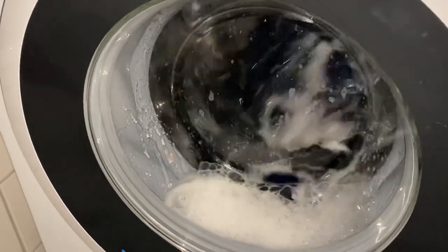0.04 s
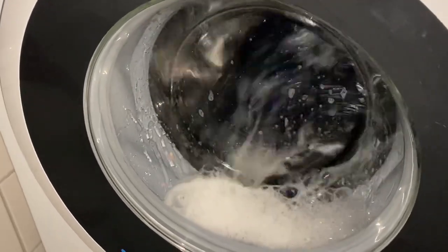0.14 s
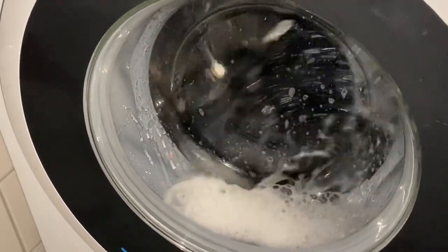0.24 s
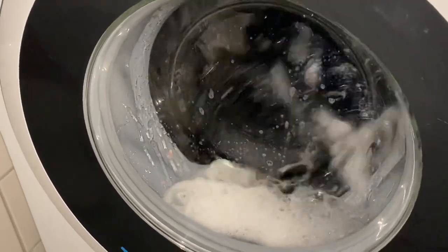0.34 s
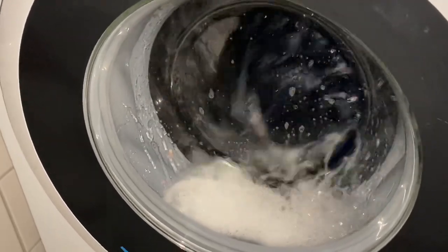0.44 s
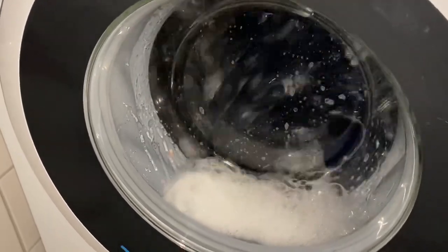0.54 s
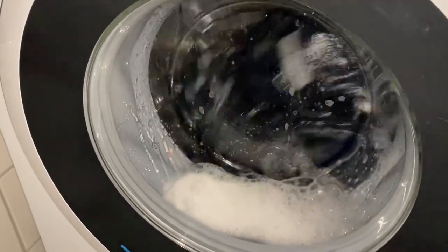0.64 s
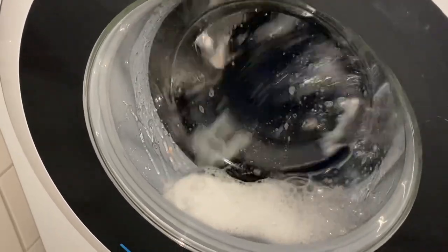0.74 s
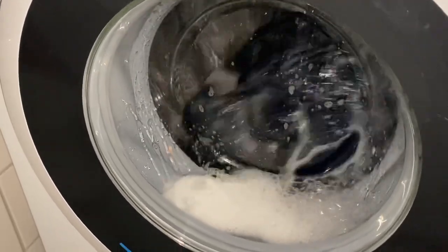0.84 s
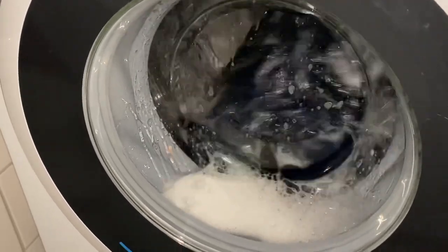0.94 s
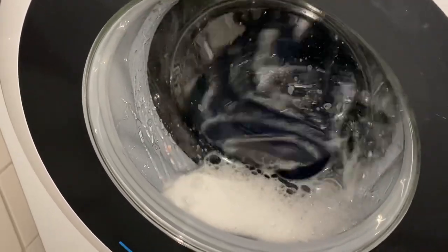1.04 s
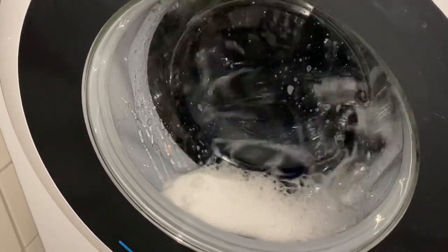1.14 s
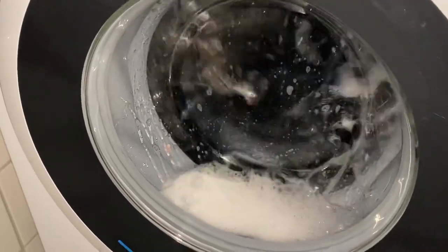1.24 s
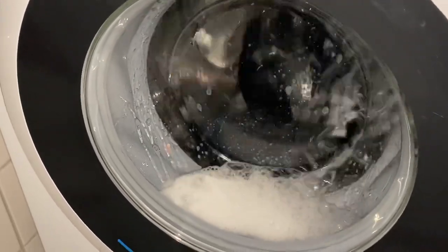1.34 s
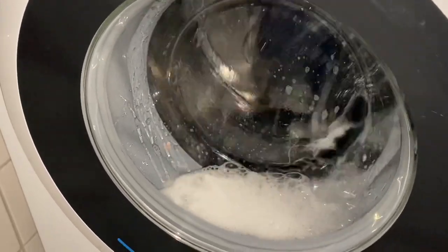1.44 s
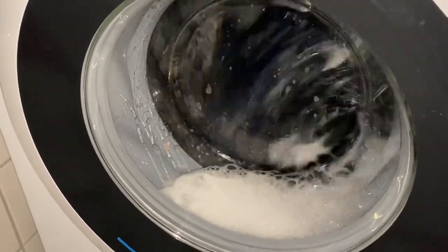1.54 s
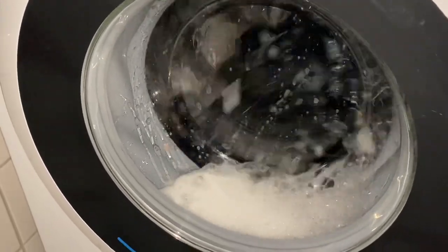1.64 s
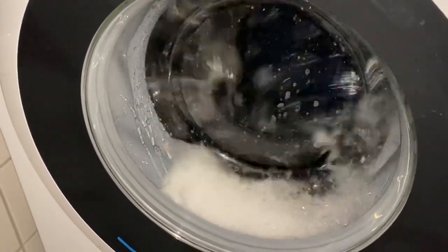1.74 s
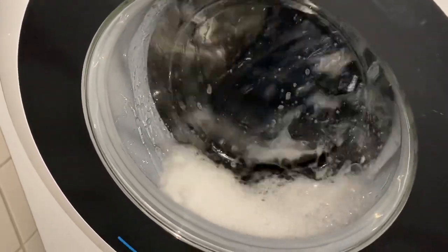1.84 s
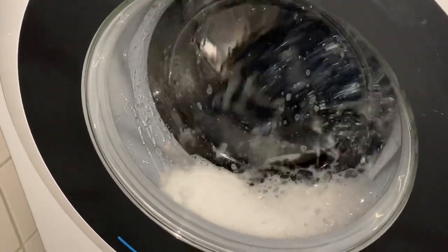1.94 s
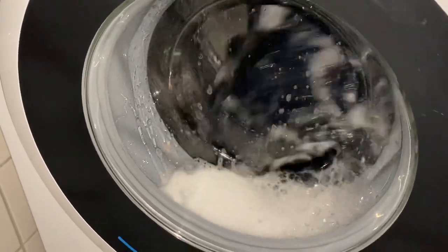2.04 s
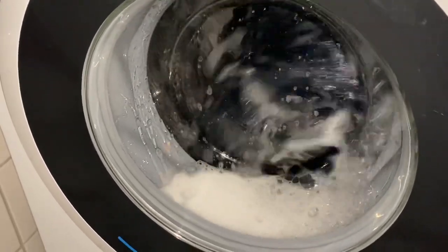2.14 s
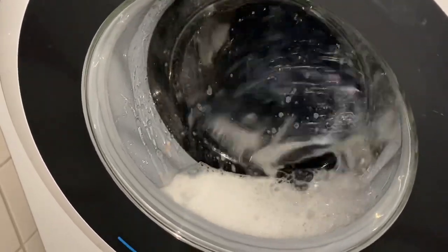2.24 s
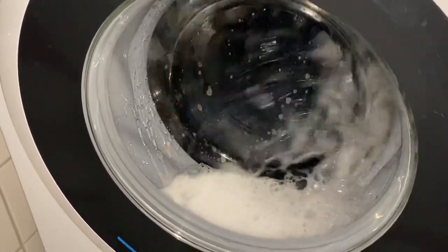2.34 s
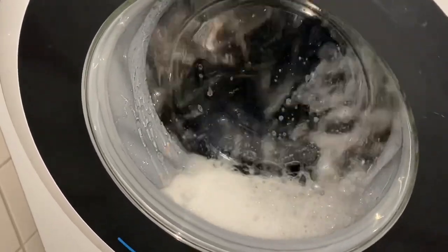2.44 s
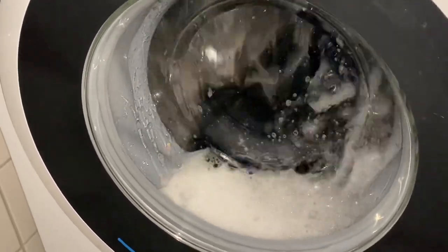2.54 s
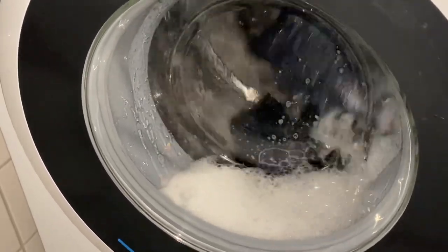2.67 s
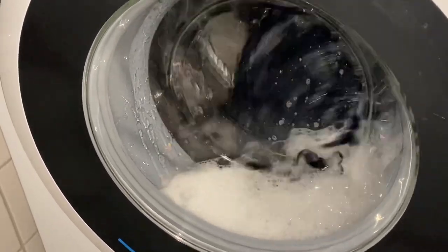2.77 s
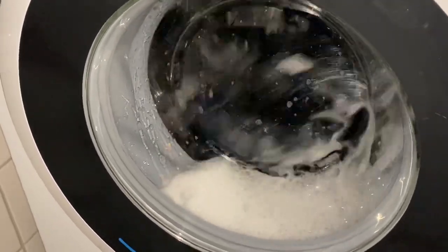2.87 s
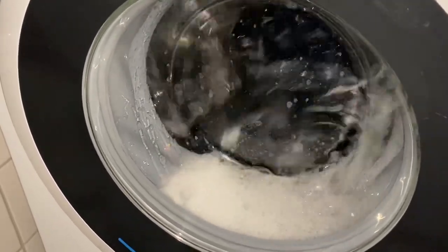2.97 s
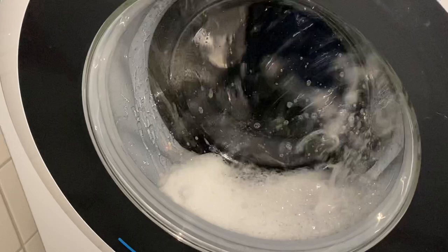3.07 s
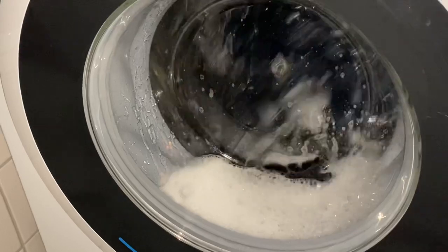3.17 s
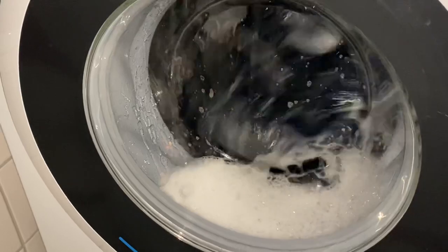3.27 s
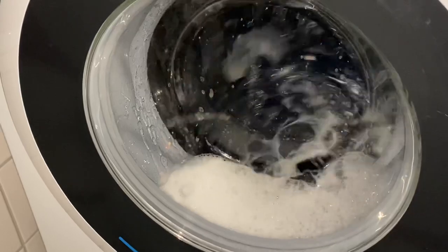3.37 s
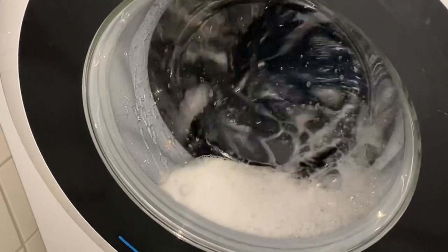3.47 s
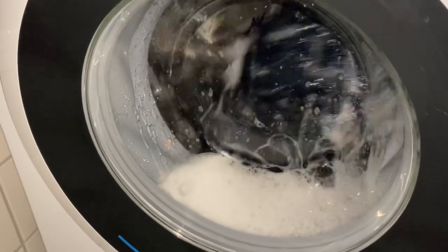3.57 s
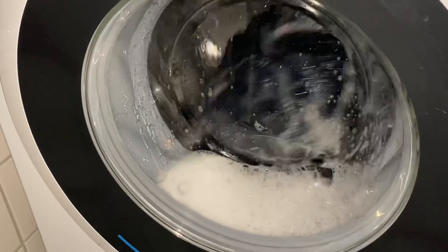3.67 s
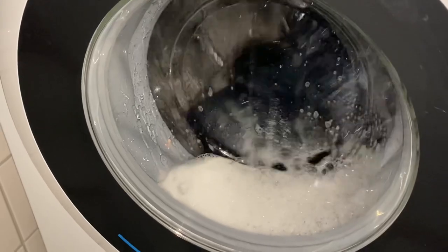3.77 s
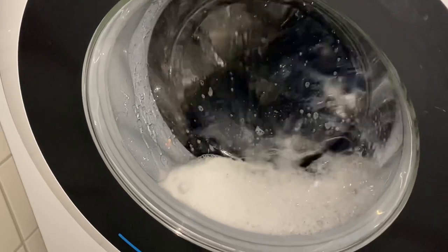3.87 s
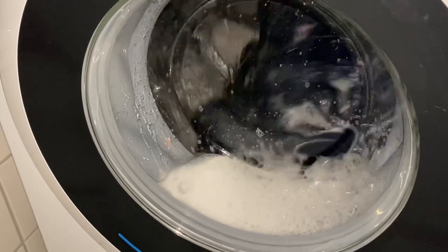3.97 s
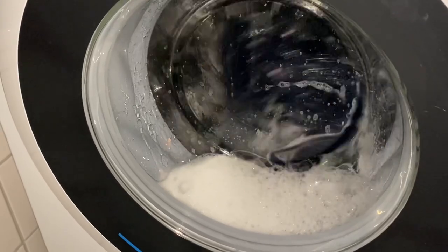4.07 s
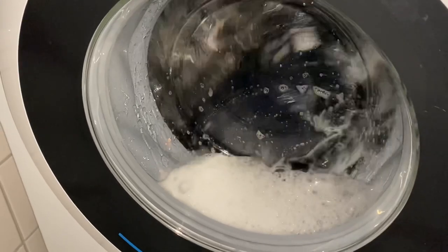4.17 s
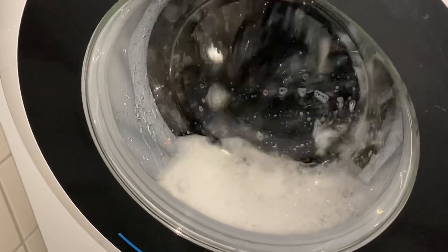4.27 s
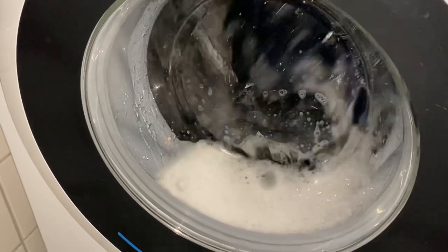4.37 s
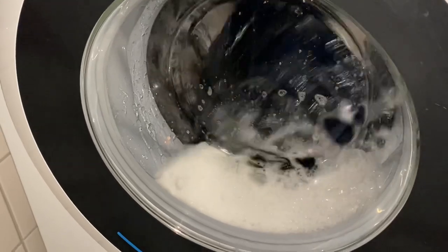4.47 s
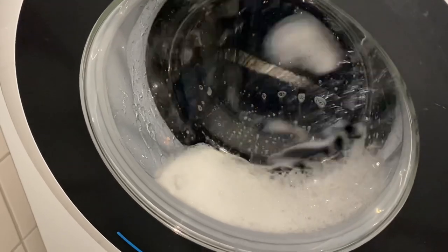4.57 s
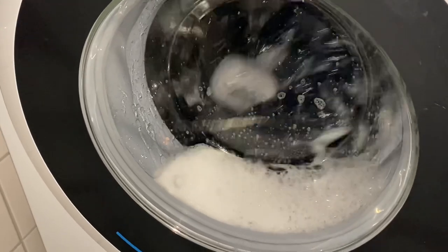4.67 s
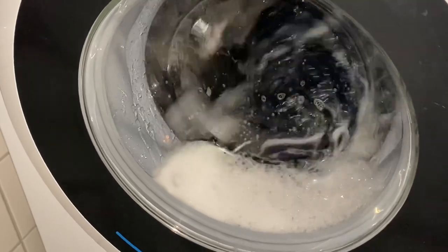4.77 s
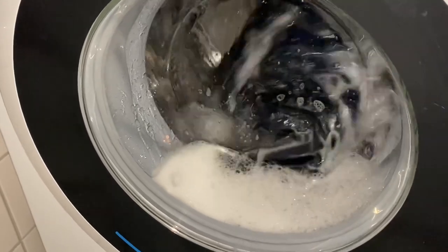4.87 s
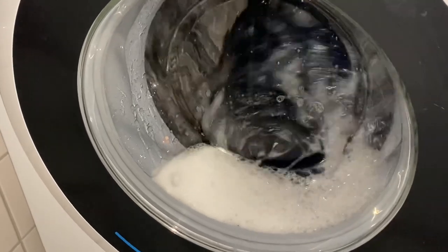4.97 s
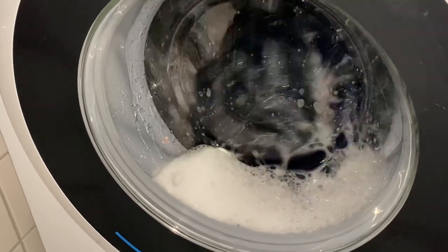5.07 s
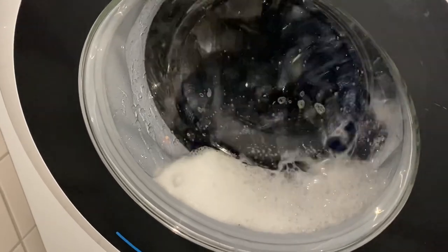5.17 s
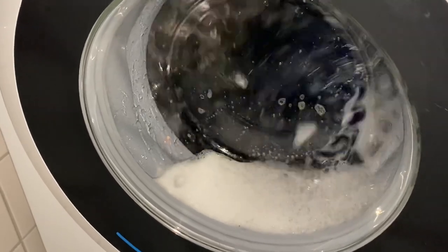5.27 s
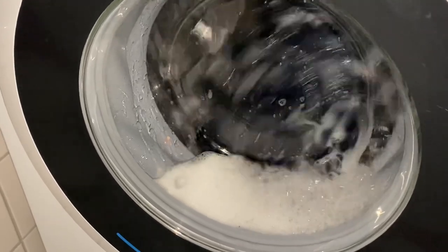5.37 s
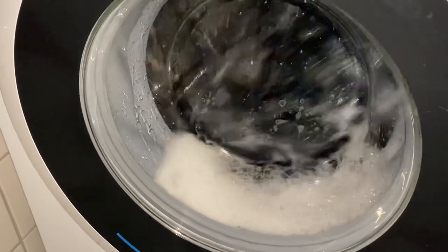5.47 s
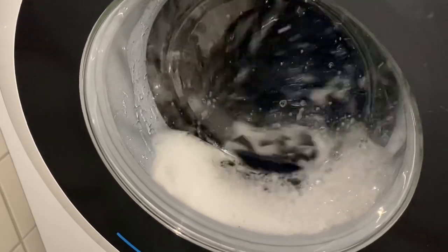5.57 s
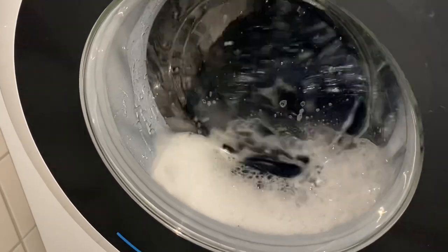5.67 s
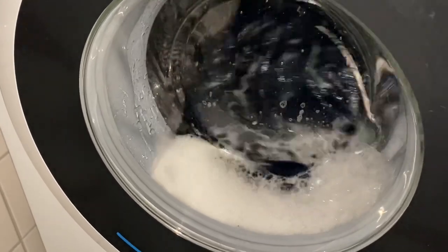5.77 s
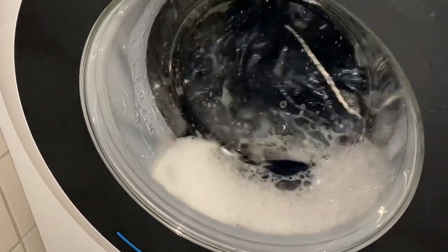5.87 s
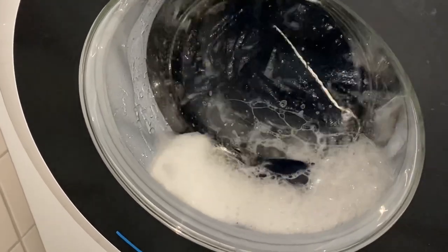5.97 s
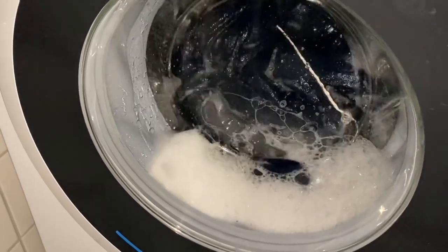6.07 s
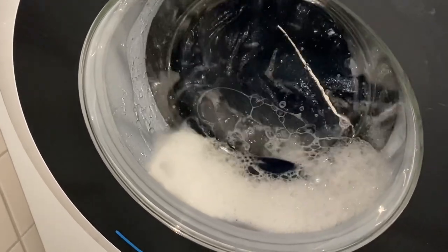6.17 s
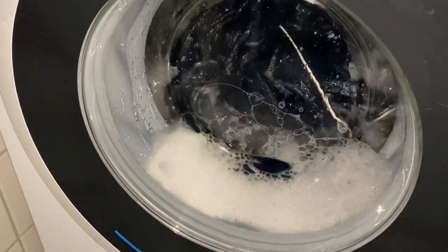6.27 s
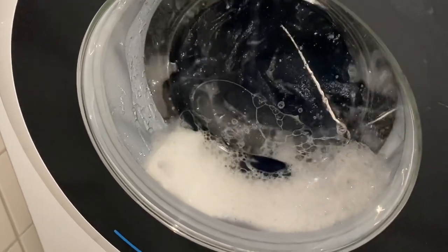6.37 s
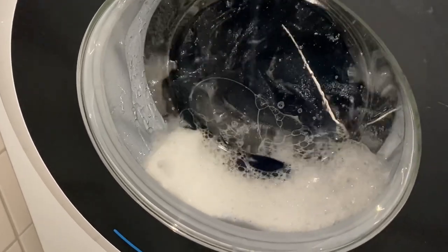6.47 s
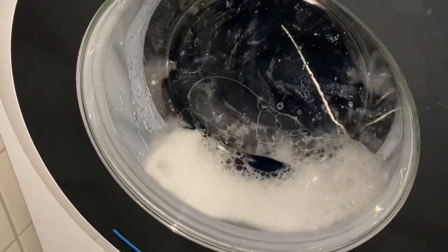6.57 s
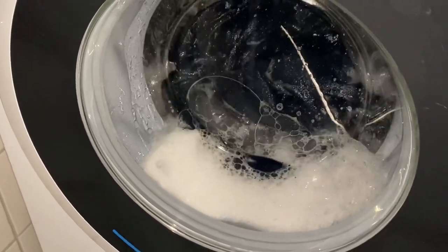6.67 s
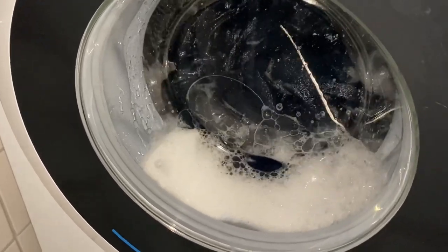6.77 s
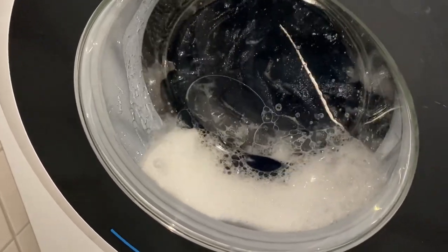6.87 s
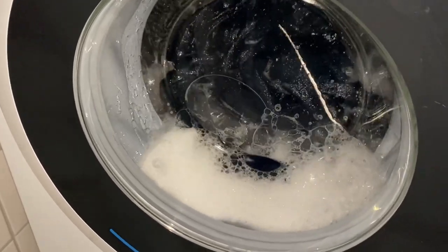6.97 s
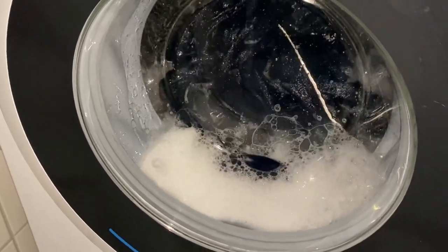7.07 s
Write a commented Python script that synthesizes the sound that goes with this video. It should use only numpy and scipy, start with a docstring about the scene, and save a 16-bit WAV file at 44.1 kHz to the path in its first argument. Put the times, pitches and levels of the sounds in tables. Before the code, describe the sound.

Wet laundry thuds and sloshes in a front-loading washer close to the glass door, a hard button clacking, then the drum stops to near silence.

```python
"""Washing machine tumbling to a stop

A front-loading washer tumbles wet laundry, heard close to its glass door, then stops in a small tiled room.
Lumps of washing ring the tub's modes and set off a boom; a hard button rings the modes of the door glass.
Filtered noise makes the slosh, spray and cabinet rumble, and short ringing tones make the gurgles.
Water drains off with sliding squeaks at the stop, and a faint hum and room tone are left."""
import sys
import numpy as np
from scipy import signal
from scipy.fft import rfft, irfft, next_fast_len
from scipy.io import wavfile

SR = 44100
rng = np.random.default_rng(int(sys.argv[2]) if len(sys.argv) > 2 else 0)


def int16_out(signal):
    """Quantize to a 16-bit WAV file."""
    q = np.round(np.clip(np.atleast_2d(signal).T, -1, 1) * 32767)
    wavfile.write(sys.argv[1], SR, q.astype(np.int16))


N = 313992   # length in samples


def from_db(db):
    """Turn decibels into a plain multiplier."""
    return 10 ** (np.asarray(db) / 20)


def rms_one(x):
    """Scale a sound to an average (rms) level of 1."""
    return x / np.sqrt(np.mean(x ** 2) + 1e-20)


def at_hz(points, hz):
    """Read a table at any pitch, in straight lines over log pitch."""
    points = np.array(points)
    return np.interp(np.log(hz), np.log(points[:, 0]), points[:, 1])


def butter(order, hz, kind, x):
    """Filter a sound: keep what is below (low), above (high) or between (band) the given pitches."""
    return signal.sosfilt(signal.butter(order, hz, kind, fs=SR, output="sos"), x)


def drift(rate_hz):
    """Slow random wandering of spread 1: noise smoothed twice, worked out every 40 samples."""
    r = np.exp(-80 * np.pi * rate_hz / SR)
    noise = rng.standard_normal(N // 40 + 2002)
    slow = signal.lfilter([1], [1, -2 * r, r * r], noise)[2000:]
    return np.interp(np.arange(N) / 40, np.arange(len(slow)), rms_one(slow))


def ring(drive, hz, t60):
    """A resonance: a unit click sets a sine of height 1 ringing, which falls 60 dB in t60 seconds."""
    r, w = from_db(-60 / (t60 * SR)), 2 * np.pi * hz / SR
    return signal.lfilter([0, np.sin(w)], [1, -2 * r * np.cos(w), r * r], drive + 1e-18)


# how alike left and right are: pitch_hz, likeness (1 = the same)
LIKENESS = [(60, 0.94), (130, 0.97), (290, 0.8), (640, 0.38), (1410, 0.072), (2400, 1), (5500, 1),
            (16000, 0.94)]


def pair(mid, side, hz):
    """Left and right, as alike as the sound field is at this pitch."""
    alike = np.clip(at_hz(LIKENESS, hz), -1, 1)
    return np.sqrt(1 + alike) * mid + np.sqrt(1 - alike) * side * [[1], [-1]]


def banded_noise(spectrum, patchy_db, grain_per_s=0):
    """Half-octave bands of stereo noise, each flickering; with grains, droplets roughen it; rms 1."""
    low_hz, top_hz = spectrum[0][0], spectrum[-1][0]
    edges = low_hz * 2 ** np.arange(0, np.log2(top_hz / low_hz), .5)
    together = drift(9.9)
    white = rng.standard_normal((2, 2, N))
    drops = rng.random(N) < grain_per_s / SR
    drops = drops * from_db(5.7 * np.minimum(rng.exponential(1, N), 2.5))
    fade = from_db(-60 / (0.06 * SR))   # each droplet is a short splat
    white *= 1 + 0.4 * signal.lfilter([1], [1, -fade], drops)
    out = 0
    for k, low in enumerate(edges):
        mid, side = butter(2, [low, low * np.sqrt(2)], "band", white[k % 2])
        hz = low * 2 ** .25   # middle of the band
        level_db = at_hz(spectrum, hz) + patchy_db * (together + 0.44 * drift(42))
        out = out + from_db(level_db) * pair(mid, side, hz)
    return rms_one(out)


def resonant_noise(peaks, patchy_db):
    """Random forcing of a few resonances, each swelling on its own; rms 1."""
    out = 0
    for hz, width_hz, level_db in peaks:
        t60 = np.log(1000) / (np.pi * width_hz)   # a narrow resonance rings longer
        mid, side = ring(rng.standard_normal((2, N)), hz, t60)
        both = pair(rms_one(mid), rms_one(side), hz)
        out = out + from_db(level_db + patchy_db * drift(0.73)) * both
    return rms_one(butter(2, [0.78 * peaks[0][0], 1.3 * peaks[-1][0]], "band", out))


def swell(events, rise_s, t60):
    """Level left by all events (start_s, level_db): each rises to its peak, then dies away."""
    s, level_db = np.transpose(events)
    steps = np.arange(0, N, 40)
    since = np.maximum(steps / SR - s[:, None], 0)
    shape = from_db(-60 * since / t60) * (1 - np.exp(-since / rise_s))
    power = (from_db(level_db[:, None]) * shape / shape.max()) ** 2
    return np.interp(np.arange(N), steps, np.sqrt(power.sum(axis=0)))


def landing_swell(rise_s, t60):
    """Every landing of laundry sets off a swell, as strong as its boom_db says."""
    return swell([(row[0], row[-1]) for row in THUDS], rise_s, t60)


STOP_S, SETTLE_T60_S = 5.96, 0.99


def moving_level(times_s, level_db):
    """Loudness that follows a table, then dies away once the drum stops."""
    t = np.arange(N) / SR
    settling_db = -60 * np.maximum(t - STOP_S, 0) / SETTLE_T60_S
    return from_db(np.interp(t, times_s, level_db) + settling_db)


# tone of the quiet room: pitch_hz, level_db (per Hz, relative)
ROOM_TONE = [(30, -22), (60, -3.5), (100, 0), (150, -13), (250, -14), (400, -24), (700, -30), (1100, -40),
             (2500, -46), (8000, -52.5), (16000, -57.5)]
ROOM_TONE_DB = -60.5   # rms
HUM_HZ, HUM_WIDTH_HZ, HUM_DB = 142.4, 7, -61.5


def still_room():
    """Steady noise of the room, plus a faint hum made of noise through one narrow resonance."""
    hum = from_db(HUM_DB) * resonant_noise([(HUM_HZ, HUM_WIDTH_HZ, 0)], patchy_db=0)
    return hum + from_db(ROOM_TONE_DB) * banded_noise(ROOM_TONE, patchy_db=0.0)


# panel resonances: pitch_hz, width_hz, level_db (relative)
CABINET = [(58, 19, -6), (66.2, 13, 10.5), (89, 50, 1.5), (91, 2.1, -10)]
# how strongly the cabinet rocks under the load: start_s, level_db
RUMBLE = [(0.0, -55.5), (0.83, -48), (1.21, -56), (1.51, -45.5), (1.85, -57), (1.95, -44.5), (2.09, -63.5),
          (2.19, -47), (2.62, -51), (2.85, -39.5), (2.99, -52.5), (3.29, -42.5), (3.37, -55), (4.52, -49.5),
          (5.25, -54), (5.3, -45.5), (5.75, -51.5), (6.1, -62.5)]
# each landing shakes the cabinet, slower than the boom; dB against the boom level
RUMBLE_DB, RUMBLE_RISE_S, RUMBLE_T60_S = -19, 0.057, 0.18


def cabinet():
    """The panels resonate at random as the load rocks them and each landing shakes them."""
    shaken = from_db(RUMBLE_DB) * landing_swell(RUMBLE_RISE_S, RUMBLE_T60_S)
    rocked = moving_level(*np.transpose(RUMBLE))
    return (shaken + rocked) * resonant_noise(CABINET, patchy_db=3.5)


# water churned by the drum: start_s, slosh_db, spray_db
TUMBLE = [(0.0, -48.5, -67), (0.42, -55.5, -82), (0.83, -50.5, -84), (1.27, -58, -86), (1.51, -45, -77.5),
          (1.66, -51, -65), (1.8, -56, -83), (2.68, -53.5, -83.5), (2.9, -53, -70), (3.5, -52, -89.5),
          (3.92, -61, -92), (4.23, -55, -77), (5.27, -54, -82), (5.47, -55, -76.5), (5.64, -65, -86),
          (5.84, -67, -98), (6.1, -77, -92)]
# water slaps the door: start_s, spray_db
SLAPS = [(0.058, -77), (0.102, -83), (0.16, -60), (0.19, -62), (0.228, -68), (0.318, -66.5), (0.555, -67),
         (0.725, -67.5), (0.885, -63), (1.035, -70), (1.205, -75.5), (2.132, -73), (2.299, -75),
         (2.773, -63.5), (2.845, -75), (3.199, -64.5), (3.24, -69), (3.35, -68.5), (3.649, -70.5),
         (3.958, -77.5), (4.037, -68), (4.164, -66.5), (4.222, -66.5), (4.842, -77), (5.266, -75),
         (5.411, -68)]
SLAP_RISE_S, SLAP_T60_S = 0.0059, 0.21


def water_levels():
    """Loudness of slosh and spray: the drum churns the water, and slaps on the door add spray."""
    s, slosh_db, spray_db = np.transpose(TUMBLE)
    spray = moving_level(s, spray_db) + swell(SLAPS, SLAP_RISE_S, SLAP_T60_S)
    return moving_level(s, slosh_db), spray


# air and water in the tub: pitch_hz, width_hz, level_db (relative)
BOOM = [(135, 8.1, 1.5), (148.7, 7.3, -0.5), (185.4, 13, 1.5)]
BOOM_RISE_S, BOOM_T60_S, BOOM_BED_DB = 0.016, 0.44, -2   # after each landing; bed against the slosh


def tub_boom(slosh):
    """Air and water in the tub boom after each landing, over a bed that follows the slosh."""
    level = landing_swell(BOOM_RISE_S, BOOM_T60_S) + from_db(BOOM_BED_DB) * slosh
    return level, level * resonant_noise(BOOM, patchy_db=0.0)


GURGLES_PER_S, GURGLE_CYCLES, GURGLE_DB = 60, 14, -7.5   # dB against the slosh


def gurgles():
    """Air pockets in the suds burst at random and ring softly for some cycles; rms 1."""
    pitches = np.geomspace(220, 1100, num=14)
    born = (rng.random(N) < GURGLES_PER_S / SR) * rng.standard_normal(N)
    dealt = rng.integers(0, len(pitches), size=N)   # a pitch for each pocket
    rings = []
    for k, hz in enumerate(pitches):
        t60 = GURGLE_CYCLES / hz
        soft_start = ring(born * (dealt == k), hz, t60)
        rings.append(ring(soft_start, hz, t60 / 2) * hz / SR)
    side = sum(rings[::2]) - sum(rings[1::2])   # every other pitch leans to the other side
    return rms_one(sum(rings) + .5 * side * [[1], [-1]])


# colour of the slosh: pitch_hz, level_db (per Hz, relative)
SLOSH = [(120, -38), (200, -3.5), (301, 1.5), (457, -4), (628, -6), (1650, -20), (2140, -31), (2470, -25),
         (3000, -47), (3900, -65.5), (6600, -120)]
SURGE_DB = -11   # slosh that swells with the boom


def sloshing(slosh, boom_level):
    """Sudsy water: low flickering noise roughened by droplets, with gurgles in it."""
    wash = banded_noise(SLOSH, patchy_db=2.02, grain_per_s=14)
    return (slosh + from_db(SURGE_DB) * boom_level) * wash + from_db(GURGLE_DB) * slosh * gurgles()


# colour of the spray: pitch_hz, level_db (per Hz, relative)
SPRAY = [(1900, -7.5), (2700, -0.5), (4000, -9.5), (6500, -11.5), (10000, -17), (16500, -21)]


def spraying(spray):
    """Fine water: bright flickering noise roughened by droplets."""
    return spray * banded_noise(SPRAY, patchy_db=1.5, grain_per_s=25)


# suds run off: start_s (moment of the peak), rise_s, fall_s, pitch_hz, width_hz, level_db,
# slide_octaves_per_s
DRAIN = [(5.812, 0.0034, 0.031, 2850, 1810, -71, 0.6), (5.82, 0.0097, 0.033, 1694, 1090, -59.5, 0),
         (5.87, .03, 0.035, 1874, 900, -73, -1), (5.99, 0.023, 0.066, 750, 120, -74, 0.33),
         (5.99, 0.031, 0.062, 2650, 500, -83.5, -1.5), (6.16, 0.1, .07, 1066, 90, -80.5, -1.5)]


def drain():
    """Short gurgles and squeaks, narrow noise on a sliding pitch, as the drum comes to rest."""
    out = np.zeros((2, N))
    t = np.arange(SR // 2) / SR - .25   # 0 is the peak
    for s, rise_s, fall_s, hz, width_hz, level_db, slide in DRAIN:
        turn = np.exp(2j * np.pi * np.cumsum(hz * 2 ** (slide * t)) / SR)
        slow = butter(2, width_hz / 2, "low", rng.standard_normal((4, len(t))))
        mid, side = np.real((slow[:2] + 1j * slow[2:]) * turn)   # moves the noise up to the pitch
        shape = np.exp(-(t / np.where(t < 0, rise_s, fall_s)) ** 2)
        at = round(s * SR) - SR // 4
        out[:, at:at + len(t)] += from_db(level_db) * shape * rms_one(pair(mid, side, hz))
    return out


# door glass modes: pitch_hz, level_db (relative), t60_s (time to fall 60 dB after a clack)
GLASS = [(1647, -11, 0.11), (2458, 1, 0.1), (2436, -15, 0.2), (3170, -11.5, 0.08), (3492, -8, 0.076),
         (3567, -10, 0.07), (4662, -1, 0.071), (5450, 2, 0.022), (5230, -13.5, 0.05), (6080, -11.5, 0.05),
         (7650, -13.5, 0.041), (9575, -11, 0.05), (10150, -10, 0.03), (11900, -17, 0.04), (14950, -19, .03)]
BRUSH_END_S = 5.7


def pattering(spray):
    """Wet cloth brushing the door keeps its lower glass modes faintly alive and damps them too."""
    brushing = np.arange(N) / SR < BRUSH_END_S
    touch = spray * rng.standard_normal(N) * from_db(4.0 * drift(25)) * brushing
    touch = butter(2, 2600, "low", touch)
    # damped by the cloth: half the ringing time
    return sum(from_db(level_db - 18.5) * ring(touch, hz, .5 * t60) for hz, level_db, t60 in GLASS)


# button on the door glass: start_s, peak_db (before the left-right balance),
# hardness (treble tilt, dB per octave), then how well the spot struck moves
# the 2.5 kHz pair (pair_db), the 4.7 kHz mode (spot_db) and the 5.4 kHz modes (upper_db)
CLACKS = [(0.271, -31.5, -2, -0.5, 5, -4), (0.3562, -23, 16, 15.5, -0.5, -13), (0.377, -46, 5, -5, -5, -2),
          (0.7046, -45.5, -36, -8.5, 12, 0), (0.7984, -17.5, 2, 0.5, 2.5, -4),
          (1.26, -50.5, -23, -4, 17, 7), (1.5297, -23.5, 31, 8, -15, 4.5), (1.6224, -41, -19, 2, -5, 19),
          (1.6814, -15, 2, 3, -7, -3), (1.7938, -46, -11, 0, 5, 9),
          (2.9718, -33.5, -10.5, -0.5, 10.5, -4.5), (3.049, -42, -38, -9, 20, 0),
          (4.327, -13.5, 2.5, 2.5, 5, -3), (4.3403, -24, 6, -17, 5, -2.5),
          (4.609, -49.5, -29, -10, 9.5, 2.5), (5.5104, -14.5, 8.5, 4.5, -12, 2.5),
          (5.53, -34, 13, -11, -8, -3)]
CHATTER_DB, CHATTER_T60_S = -29.5, 0.079   # the button skitters on the glass after the first touch
CLACK_TOP_DB = -3.5   # above 12.3 kHz
HARD_TOP_HZ, FIZZ_OCT_PER_TILT = 7000, 0.049   # the tilt levels off here; a harder touch fizzes higher


def clacks():
    """A button's touch gives a short crack, rings the glass modes and leaves a fizz of dense high modes."""
    out = np.zeros(N + SR)
    t = np.arange(SR // 4) / SR
    for s, peak_db, tilt_db, pair_db, spot_db, upper_db in CLACKS:
        chatter = from_db(CHATTER_DB - 60 * t / CHATTER_T60_S) * rng.standard_normal(len(t))
        click = (t == 0) + chatter
        shot = np.zeros(len(t))
        for hz, level_db, t60 in GLASS:
            mode_db = level_db + tilt_db * np.log2(np.clip(hz, 2455, HARD_TOP_HZ) / 2455)
            mode_db += pair_db * (2000 < hz < 3000)
            mode_db += spot_db * (4000 < hz < 5000)
            mode_db += upper_db * (5000 < hz < 5600)
            shot += from_db(mode_db + rng.normal(0, 2.5)) * ring(click, hz, t60)
        # a quick crack, then two slower tails
        dying = from_db(12.0 - 60 * t / 0.015) + from_db(-11.0 - 60 * t / 0.045) + from_db(-9.5 - 60 * t / 0.19)
        fizz_hz = 1800 * 2 ** (FIZZ_OCT_PER_TILT * max(tilt_db, 0))
        fizz = butter(2, [fizz_hz, 15000], "band", dying * rng.standard_normal(len(t)))
        shot += from_db(tilt_db) * fizz
        shot = butter(6, 12300, "low", shot) + from_db(CLACK_TOP_DB) * butter(6, 12300, "high", shot)
        at = round(s * SR)
        out[at:at + len(t)] += from_db(peak_db) * shot / abs(shot).max()
    return out[:N]


# laundry lands in the tub: start_s, peak_db, pitch_hz (where it rings most), splash_db, boom_db
THUDS = [(0.065, -42, 310, -63, -46.5), (0.16, -36.5, 614, -40.5, -36.5), (0.553, -45, 240.5, -45, -43),
         (0.717, -38, 260, -50, -39.5), (0.867, -23.5, 303, -69.5, -47), (0.895, -31.5, 374, -73, -62),
         (1.069, -35, 243, -43.5, -48), (1.271, -43.5, 290.6, -60, -43.5),
         (1.481, -41.5, 258, -41.5, -35.5), (1.888, -38.5, 780, -57.5, -42.5),
         (2.132, -13.5, 390, -32.5, -47), (2.154, -29, 760, -70, -57), (2.161, -24, 412, -70, -52.5),
         (2.292, -38.5, 620, -49, -53), (2.786, -26, 307, -39.5, -42), (2.845, -32.5, 260, -43, -63),
         (3.062, -33.5, 283.6, -48.5, -45), (3.352, -34.5, 310.5, -45, -56.5), (3.42, -12, 610, -37, -46),
         (3.53, -20.5, 650, -40.5, -44.5), (3.662, -35, 336, -61, -42), (3.956, -36.5, 334.4, -43, -50),
         (4.037, -34.5, 299, -44, -40.5), (4.112, -32.5, 662, -61, -42.5), (4.221, -36.5, 288, -47, -45),
         (4.501, -35.5, 610, -54, -46), (4.691, -17.5, 720, -45, -40.5), (4.714, -25.5, 560, -61, -55),
         (4.76, -24.5, 420, -41.5, -42), (4.842, -23.5, 600, -31.5, -51), (4.855, -18.5, 360, -38.5, -56),
         (5.117, -44, 620, -52, -65), (5.358, -38.5, 285, -45.5, -39), (5.651, -45, 404, -78, -48)]
# tub and drum modes: pitch_hz, level_db (relative), t60_s (time to fall 60 dB)
TUB = [(195, -11, 0.43), (248, -10, 0.32), (307, -3.5, 0.2), (342, -2, 0.071), (412, -3, 0.2),
       (506.8, -4.5, 0.27), (597, -3, 0.051), (615, 1, 0.11), (677, -2, 0.088), (786.6, -2, 0.08),
       (898, -9.5, 0.13), (1160, -14, 0.013), (1490, -12, .05), (1635, -12.5, 0.068), (2110, -16.5, 0.0077)]
# colour of the splash: pitch_hz, level_db (per Hz, relative)
SPLASH = [(530, -35.5), (900, -1), (1620, -4), (1850, -12), (3040, -21), (6720, -50.5), (8980, -66.5),
          (16000, -63.5)]
# noisy wallow against the blow, for a -29.5 dB landing; it grows a little for louder ones
WALLOW_DB, WALLOW_PER_DB, WALLOW_T60_S = -29, 0.09, 0.35
CONTACT_HZ, SOFT_OCT_PER_DB = 2620, .03   # treble limit for a -19.5 dB landing; weaker ones are duller
DETUNE = .025   # the water load shifts the modes: spread as a share of the pitch
FOCUS_DB = -23.5   # loss per octave off pitch, up to half an octave
SMOTHER_S, SMOTHER_DB = 0.051, -4.5   # the cloth settles on the wall and damps the first ring
# the first touch briefly rings all upper modes, level for a -13.5 dB landing; heavier lumps smack harder
SMACK_DB, SMACK_PER_DB, SMACK_T60_S, SMACK_FROM_HZ = -10.5, 0.04, 0.04, 670


def thuds():
    """Each lump gives a soft blow, wallows noisily and splashes; modes near its pitch answer most."""
    out, splash = np.zeros((2, N + SR)), np.zeros(N + SR)
    t = np.arange(SR // 2) / SR
    smother = from_db(SMOTHER_DB * (1 - np.exp(-(t / SMOTHER_S) ** 2)))
    splash_fall = from_db(-60 * t / 0.028) + 0.48 * from_db(-60 * t / 0.28)
    splash_shape = (1 - np.exp(-t / 0.0046)) * splash_fall
    for s, peak_db, pitch_hz, splash_db, _ in THUDS:
        wallow_db = WALLOW_DB + WALLOW_PER_DB * (peak_db + 29.5)
        smack_db = SMACK_DB + SMACK_PER_DB * (peak_db + 13.5)
        shot = np.zeros((2, len(t)))
        for hz, level_db, mode_t60 in TUB:
            wallow = from_db(wallow_db - 60 * t / WALLOW_T60_S) * rng.standard_normal((2, len(t)))
            blow = np.zeros_like(wallow)
            blow[:, int(rng.uniform(0, .002) * SR)] = rng.normal(1, 0.3), rng.normal(0, 0.26)
            off_db = FOCUS_DB * min(abs(np.log2(hz / pitch_hz)), .5)
            mode = ring(wallow + blow, hz * rng.normal(1, DETUNE), mode_t60)
            shot += from_db(level_db + off_db) * pair(*mode, hz)
            if hz > SMACK_FROM_HZ:
                shot += from_db(level_db + smack_db) * pair(*ring(blow, hz, SMACK_T60_S), hz)
        # wet cloth hits softly
        soft_hz = CONTACT_HZ * 2 ** (SOFT_OCT_PER_DB * (peak_db + 19.5))
        shot = butter(4, soft_hz, "low", shot) * smother
        at = round(s * SR)
        out[:, at:at + len(t)] += from_db(peak_db) * shot / abs(shot).max()
        splash[at:at + len(t)] += from_db(splash_db) * splash_shape
    return out[:, :N] + splash[:N] * banded_noise(SPLASH, patchy_db=2.0)


ROOM_T60_S, WALL_CUT_HZ, ROOM_DB = 0.42, 13000, -25.5


def room(x):
    """Eight feedback delays each for the shared and the differing part, duller on every round."""
    size = next_fast_len(N + SR)
    w = 2 * np.pi * np.arange(size // 2 + 1) / size
    dull = np.exp(-2 * np.pi * WALL_CUT_HZ / SR)
    wall = (1 - dull) / (1 - dull * np.exp(-1j * w))
    answer = np.zeros((2, len(w)), complex)
    for k, lag in enumerate((rng.uniform(0.0071, 0.027, 16) * SR).astype(int)):
        loop = from_db(-60 * lag / SR / ROOM_T60_S) * wall * np.exp(-1j * w * lag)
        answer[k % 2] += loop / (1 - loop) * (-1) ** (k // 2)
    mid, side = irfft(rfft(x, size) * answer, size)[:, :N]
    side = butter(4, 3500, "low", side)   # left and right share the same treble
    return mid + side * [[1], [-1]]


def scene():
    """Mix all sounds; only the thuds and the glass sounds (clacks and pattering) echo in the room."""
    slosh, spray = water_levels()
    boom_level, boom = tub_boom(slosh)
    water = sloshing(slosh, boom_level) + spraying(spray) + drain()
    background = (still_room() + cabinet() + boom + water) * from_db([[.4], [-.4]])
    glass = (pattering(spray) + clacks()) * from_db([[.6], [-.6]])   # left a little louder
    echoing = glass + thuds()
    return background + echoing + from_db(ROOM_DB) * room(echoing.mean(axis=0))


MIC_LOW_HZ, CUTOFF_HZ = 46.4, 16900
LAG_FROM_HZ, LAG_S = 7040, 0.00027


def record(dry):
    """The bass falls off, the left channel lags in the treble only, the top is cut."""
    size = next_fast_len(N + 1000)
    hz = np.arange(size // 2 + 1) * SR / size
    lag = np.exp(-1j * 2 * np.pi * LAG_S * np.maximum(hz - LAG_FROM_HZ, 0))
    left = irfft(rfft(dry[0], size) * lag, size)[:N]
    thin = butter(4, MIC_LOW_HZ, "high", [left, dry[1]])
    return signal.sosfilt(signal.cheby2(12, 70, CUTOFF_HZ, fs=SR, output="sos"), thin)


dry = scene()
out = record(dry)
int16_out(out)
```